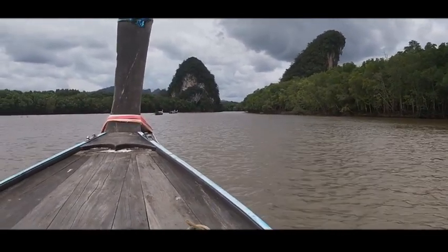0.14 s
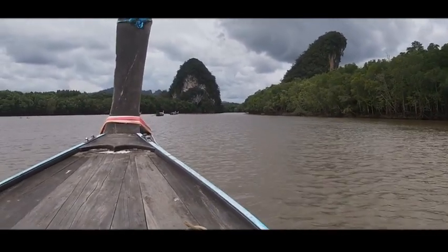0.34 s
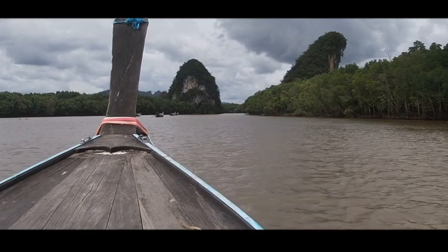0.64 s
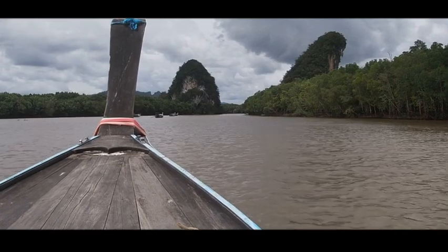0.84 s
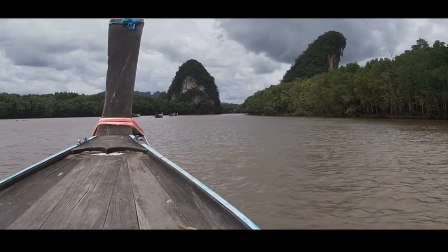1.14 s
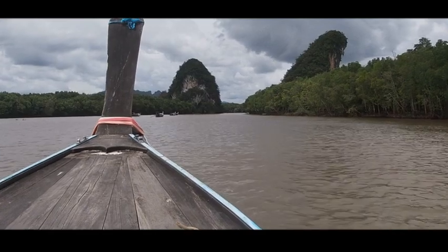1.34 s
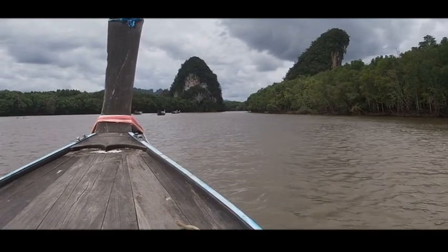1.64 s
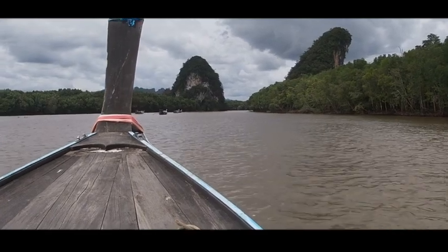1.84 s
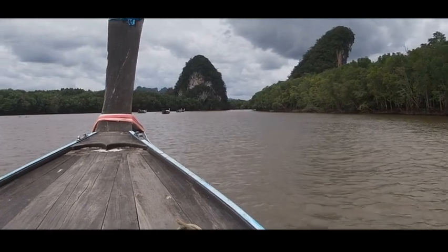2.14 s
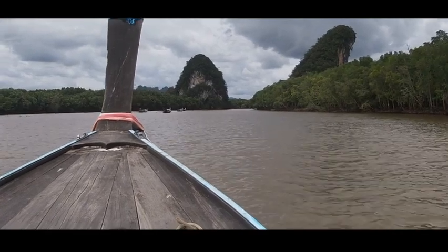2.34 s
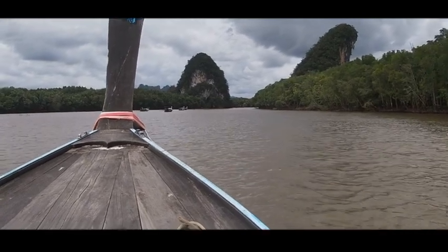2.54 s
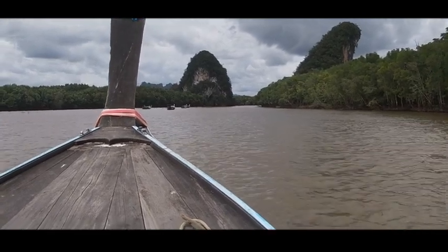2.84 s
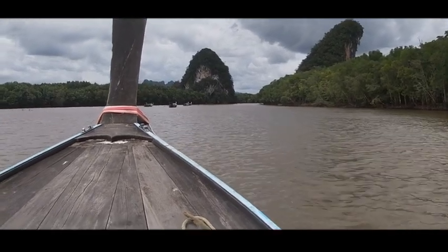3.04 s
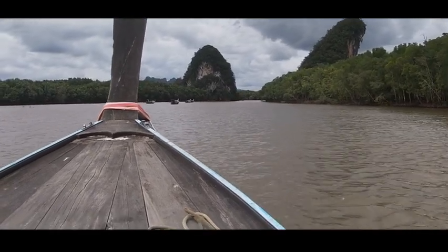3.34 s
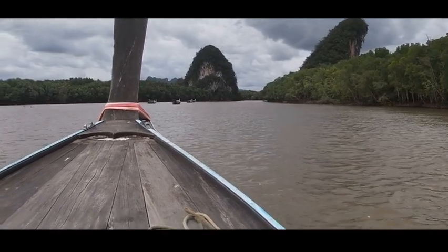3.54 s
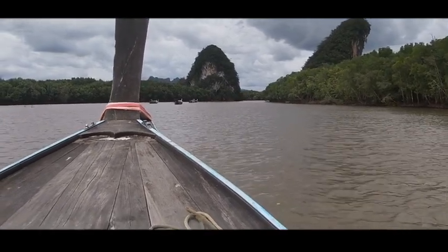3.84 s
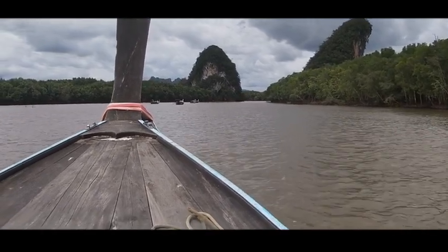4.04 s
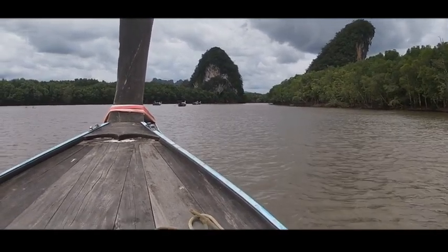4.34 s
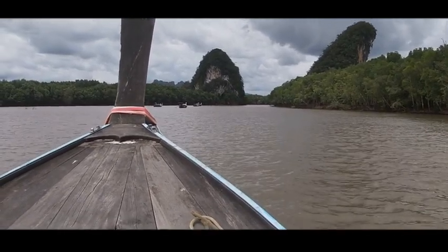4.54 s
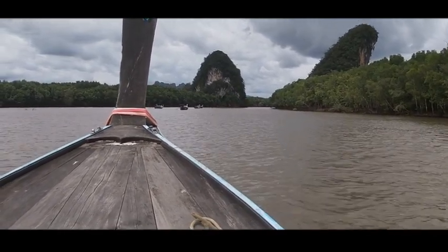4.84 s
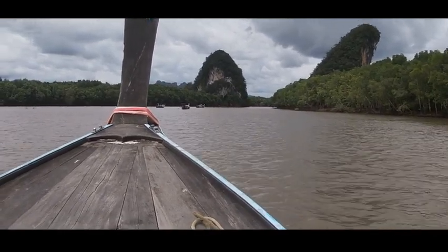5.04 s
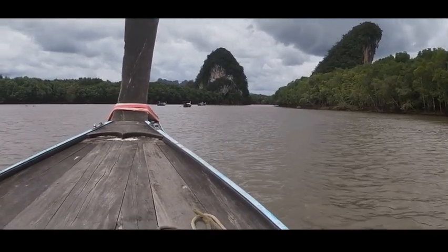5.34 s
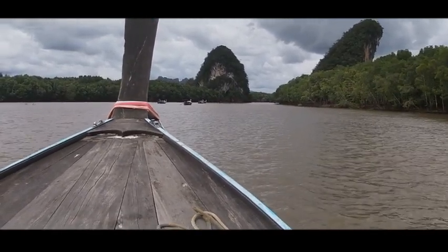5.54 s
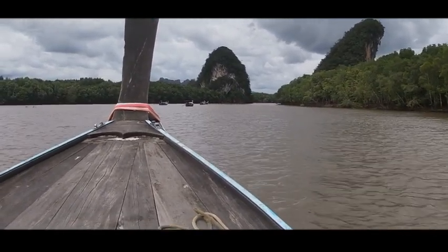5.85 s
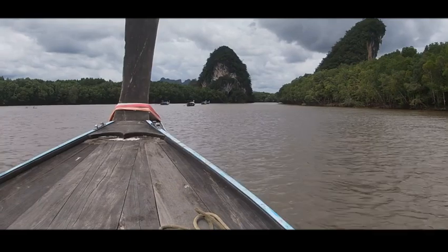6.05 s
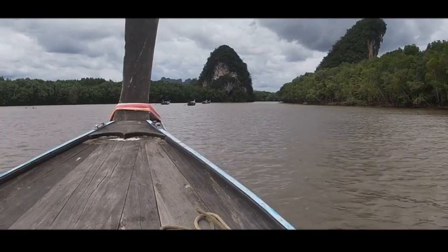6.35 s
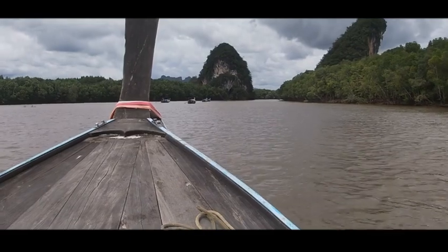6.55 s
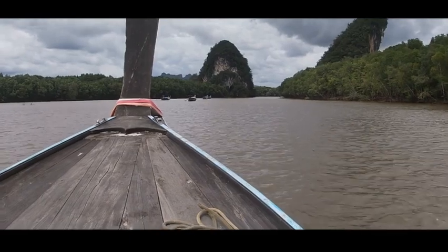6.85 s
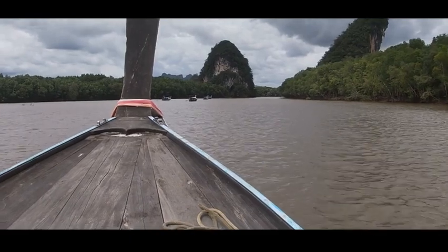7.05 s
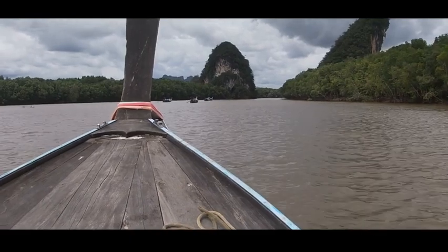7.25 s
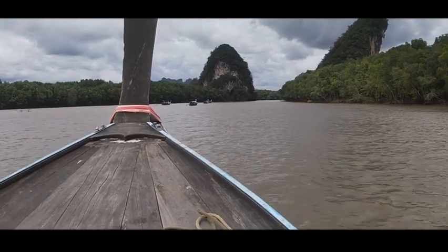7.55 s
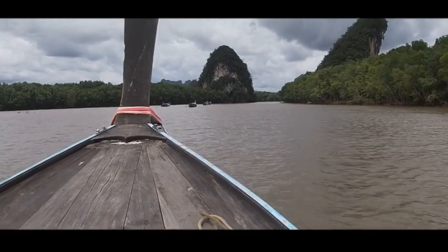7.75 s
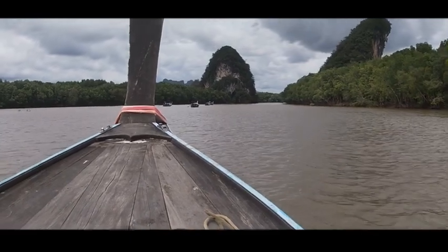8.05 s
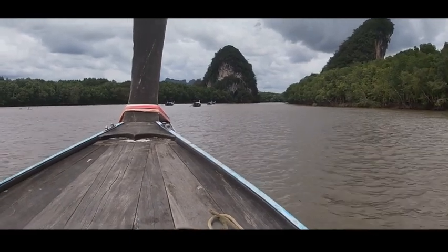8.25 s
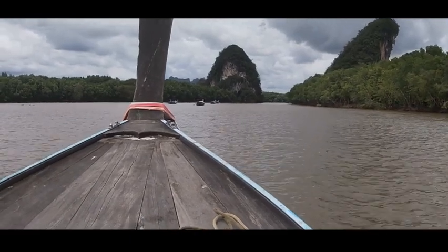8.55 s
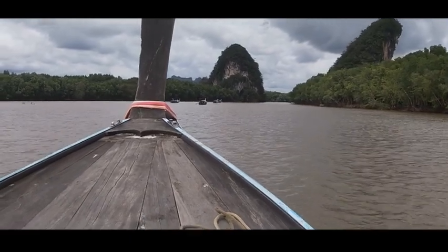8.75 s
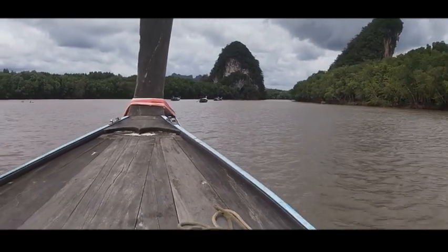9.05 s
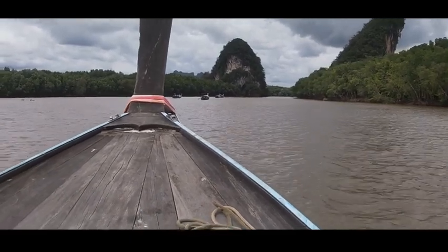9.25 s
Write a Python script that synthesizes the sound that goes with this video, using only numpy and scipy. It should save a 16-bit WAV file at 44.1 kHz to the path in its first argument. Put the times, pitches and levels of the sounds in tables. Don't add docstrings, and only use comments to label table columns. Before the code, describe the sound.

From 0 s a diesel engine is already running on a wooden river boat, heard from the bow in the open air. A deep drone around 58 and 115 Hz dominates, with rough exhaust rumble and an uneven propeller throb resonating through the planks. Softer metallic clatter and hissing bow wash sit above it. A loose sheet-metal cover rattles at the opening, then settles. Small waves subtly change the hull tone, notably near 2.7 and 3.7 s. Around 3 s a short jolt briefly tightens the rattle and raises its pitch. Longer rattles swell near 4.5 and 5.9 s, with shorter or milder ones near 6.8, 7.3 and 8.2 s. From about 6 s the engine gains speed almost imperceptibly. At 9.2 s a very faint, thin, high whistle enters from the bank, rising slightly beside a final rattle as the drone continues to the end.

```python
import sys
import numpy as np
from scipy import signal
from scipy.io import wavfile
from scipy.ndimage import uniform_filter1d

SR = 44100
rng = np.random.default_rng(int(sys.argv[2]) if len(sys.argv) > 2 else 0)


def how_loud(loudness_db):
    steps = np.asarray(loudness_db, float) / 20
    return 10 ** steps


def generate_wav(sig):
    pcm = np.round(np.clip(np.atleast_2d(sig).T, -1, 1) * 32767).astype(np.int16)
    wavfile.write(sys.argv[1], SR, pcm)


N = 414981

# time_s, cycle_rate_hz
CYCLE_RATE = [(0.0, 14.378), (0.78, 14.323), (1.18, 14.266), (1.57, 14.321), (1.96, 14.356), (2.35, 14.325),
              (2.74, 14.329), (3.14, 14.372), (3.92, 14.377), (4.31, 14.398), (5.1, 14.398), (5.49, 14.37),
              (5.88, 14.422), (7.06, 14.501), (8.23, 14.544), (8.63, 14.598), (9.41, 14.61)]
CRUISE_HZ = 14.4
# order, level_db (rms)
ENGINE_ORDERS = [(2, -36.4), (3, -32.8), (4, -19.7), (5, -33.0), (6, -21.6), (8, -15.8), (9, -25.3),
                 (10, -31.9), (11, -40.1), (12, -25.5), (14, -43.9), (15, -42.7), (16, -30.0), (17, -31),
                 (18, -33.8), (19, -33.2), (20, -30.2), (21, -32.9), (22, -39.3), (23, -40.1), (24, -37.4),
                 (25, -43.9), (26, -45.1), (27, -44.0), (28, -36.2), (30, -46.2), (31, -48.4), (32, -46.8),
                 (36, -45.4), (40, -42.3)]
HULL_TAKE = {4: (-20, -1, 2.5, 0), 6: (-23.5, -16.5, 1.5, 3.2), 8: (-14.5, 9, -6, -0.14),
             12: (-25, -21.5, 1.5, 1.3)}
# centre_s, strength (1 = strong), length_s
WAVES = [
    (.2, 0.42, .4),
    (2.65, 1.1, 0.21),
    (3.7, 0.9, 0.33),
    (4.85, 0.52, .3),
    (5.55, 0.5, 0.47),
]
# order, level_db (rms)
PROPELLER_LINES = [(4.44, -31.5), (5.56, -31), (6.44, -26), (7.56, -31.5), (9.56, -24), (10.44, -25)]
# frequency_hz, density_db_per_hz
RUMBLE_SPECTRUM = [(15, -31.5), (45, -15), (65, -6.5), (80, -4.5), (100, -17), (120, 2.5), (145, -7.5),
                   (163, -13), (215, -12), (255, -8), (310, -13.5), (335, -8.5), (380, -20), (800, -31)]
RUMBLE_DB, RUMBLE_WAVE_DB, RUMBLE_DB_PER_HZ = -17.5, 1.5, -2.5
# frequency_hz, width_hz, level_db
COVER_MODES = [(1472, 45, 0), (1508, 50, -1), (1560, 100, -1)]
COVER_DB = -42
# centre_s, rise_db, length_s
SHAKES = [
    (0.0, 6.3, 0.72),
    (3.0, 8.3, 0.26),
    (4.5, 7.9, 0.67),
    (5.9, 7.1, 0.72),
    (6.75, 7.1, 0.29),
    (7.3, 6, .4),
    (8.2, 4.5, 0.62),
    (9.41, 6.5, 0.23),
]
# centre_s, rise_hz, length_s
COVER_BEND = [
    (2.95, 70, 0.22),
]
# frequency_hz, width_hz, level_db (rms)
PARTS = [(455, 25, -42), (520, 20, -44), (585, 28, -39), (630, 30, -43), (870, 40, -48), (930, 30, -45),
         (1045, 30, -47), (1280, 60, -47), (1385, 30, -50), (1960, 80, -52), (2290, 40, -52),
         (2860, 90, -50), (3880, 60, -58), (4410, 50, -59), (4950, 40, -60), (5290, 70, -57),
         (5450, 120, -57), (5870, 70, -60), (6420, 50, -69), (7500, 70, -69), (9160, 200, -71),
         (11650, 100, -79)]
# frequency_hz, density_db_per_hz
WASH_SPECTRUM = [(290, -35.5), (500, -4), (583, -3), (761, -7.5), (888, -6), (1160, -13), (1510, -11),
                 (2090, -17.5), (2880, -19), (4320, -26), (5400, -26.5), (6950, -36.5), (12000, -46.5),
                 (13400, -55), (15700, -63)]
WASH_DB, WASH_WAVE_DB = -30, 0.8
WASH_PER_SHAKE = 0.068
# time_s, pitch_hz, level_db
WHISTLE = [
    (9.24, 7760, -70),
    (9.27, 7750, -60),
    (9.33, 7765, -59),
    (9.37, 7780, -54),
    (9.41, 7815, -56),
]


def curve(rows, column):
    rows = np.asarray(rows)
    return np.interp(np.arange(N) / SR, rows[:, 0], rows[:, column])


def bumps(rows):
    t = np.arange(N) / SR
    return sum(height * np.exp(-((t - s) / length) ** 2) for s, height, length in rows)


def evened(x):
    return x / np.sqrt(np.mean(x ** 2) + 1e-20)


def drift(rate_hz):
    t = np.arange(0, N + 512, 512) / SR
    rates = np.geomspace(.1, rate_hz, num=16)
    waves = sum(np.sin(2 * np.pi * (f * t + rng.random())) / np.sqrt(f) for f in rates)
    return np.interp(np.arange(N) / SR, t, evened(waves))


def resonate(x, hz, width):
    turn = np.exp(2j * np.pi * np.cumsum(hz * np.ones(N)) / SR)
    r = np.exp(-np.pi * width / SR)
    smooth = signal.lfilter([(1 - r) ** 2], [1, -2 * r, r * r], x / turn)
    return 2 * (turn * smooth).real


def noise(spectrum, size, patchy_db, ripple_db):
    frames = 4 * N // size + 5
    hz = np.fft.rfftfreq(size, 1 / SR)
    a, b, patches, ripple = rng.standard_normal((frames, len(hz), 4)).T
    patches = uniform_filter1d(patches, size=8, axis=0)
    patches = evened(uniform_filter1d(patches, size=10, axis=1))
    ripple = uniform_filter1d(ripple, size=3, axis=0)
    ripple = evened(uniform_filter1d(ripple, size=150, axis=1))
    f, db = np.transpose(spectrum)
    colour_db = np.interp(np.log(hz + 1), np.log(f), db, left=-60)
    colour_db = colour_db - 40 * np.log10(np.maximum(hz / f[-1], 1))
    z = (a + 1j * b) * how_loud(colour_db[:, None] + patchy_db * patches + ripple_db * ripple)
    return evened(signal.istft(z, nperseg=size, noverlap=3 * size // 4)[1][:N])


def phase_lead(k):
    if k < 14:
        return .004 * k ** 2 + np.clip(1.1 / (9.6 - k), -1.2, 1.2) - .25
    pipe_mode = 2.2 * (23 < k < 28)
    return .007 * k ** 2 + np.pi * k + pipe_mode


def engine(turn):
    out = np.zeros(N)
    faster_hz = curve(CYCLE_RATE, 1) - CRUISE_HZ
    wave = bumps(WAVES)
    for k, db in ENGINE_ORDERS:
        chance = drift(3.0)
        level_db = db + 2.3 * chance
        if k in HULL_TAKE:
            mean_db, slope_db, wave_db, loose_db = HULL_TAKE[k]
            level_db = mean_db + slope_db * faster_hz + wave_db * wave + loose_db * chance
        wander = .015 * k * drift(3.5)
        out += np.sqrt(2) * how_loud(level_db) * np.cos(k * turn + phase_lead(k) + wander)
    return out


def propeller():
    out = np.zeros(N)
    for order, db in PROPELLER_LINES:
        line = resonate(rng.standard_normal(N), order * curve(CYCLE_RATE, 1), 2.9)
        out += how_loud(db) * evened(line)
    return out


def rumble():
    faster_hz = curve(CYCLE_RATE, 1) - CRUISE_HZ
    level_db = RUMBLE_DB + RUMBLE_WAVE_DB * bumps(WAVES) + RUMBLE_DB_PER_HZ * faster_hz
    return how_loud(level_db) * noise(RUMBLE_SPECTRUM, size=8192, patchy_db=.5, ripple_db=.4)


def cover(drive):
    modes = np.zeros(N)
    for hz, width, db in COVER_MODES:
        delayed = np.roll(drive, 7 * hz)
        modes += how_loud(db) * evened(resonate(delayed, hz + bumps(COVER_BEND), width))
    return how_loud(COVER_DB + bumps(SHAKES)) * evened(modes)


def clatter(turn):
    puffs = 1 + .13 * np.cos(4 * turn) + .1 * np.cos(turn) + .08 * np.cos(8 * turn)
    drive = puffs * rng.standard_normal(N)
    out = cover(drive)
    for hz, width, db in PARTS:
        out += how_loud(db + 1.4 * drift(2.5)) * evened(resonate(drive, hz, 1.11 * width))
    return out


def wash():
    level_db = WASH_DB + WASH_WAVE_DB * bumps(WAVES) + WASH_PER_SHAKE * bumps(SHAKES)
    return how_loud(level_db) * noise(WASH_SPECTRUM, size=4096, patchy_db=0.36, ripple_db=2.0)


def whistle():
    on = np.arange(N) / SR > WHISTLE[0][0]
    phase = 2 * np.pi * np.cumsum(curve(WHISTLE, 1)) / SR
    return on * np.sqrt(2) * how_loud(curve(WHISTLE, 2)) * np.sin(phase)


def scene():
    turn = 2 * np.pi * np.cumsum(curve(CYCLE_RATE, 1)) / SR - .04
    mix = engine(turn) + propeller() + rumble() + clatter(turn) + wash() + whistle()
    return mix[None]


def band_limit(x):
    return signal.sosfilt(signal.butter(12, 15700, fs=SR, output="sos"), x)


def record(dry):
    over = np.maximum(abs(dry) - .6, 0)
    limited = dry - np.sign(dry) * (over - .36 * np.tanh(over / .42))
    limited *= np.minimum(.35 + np.arange(N) / (.005 * SR), 1)
    return band_limit(limited - .0012)


dry = scene()
out = record(dry)
generate_wav(out)
```